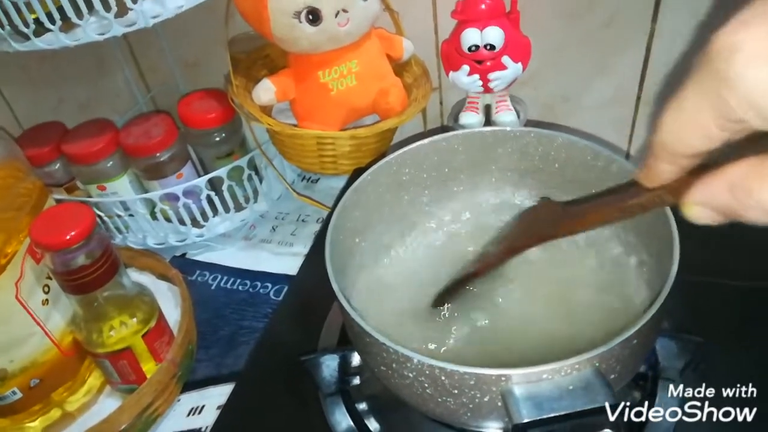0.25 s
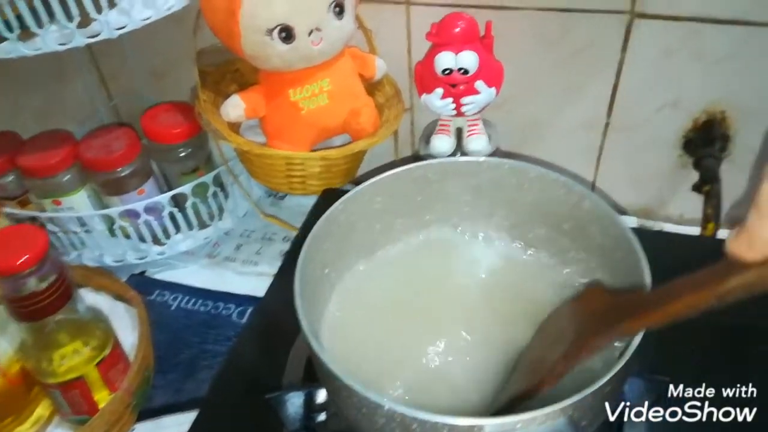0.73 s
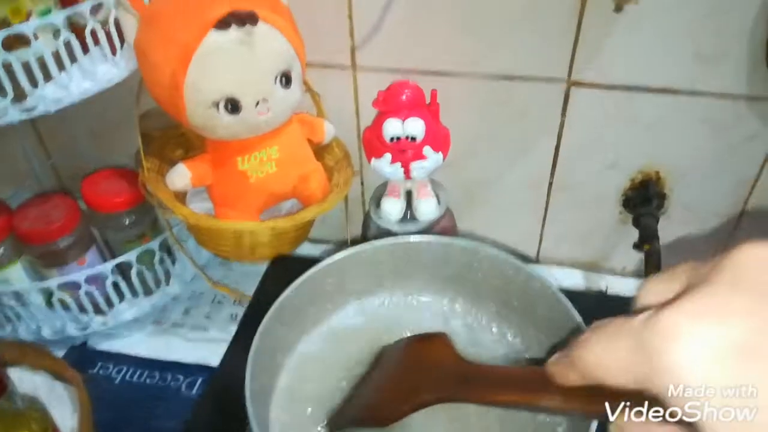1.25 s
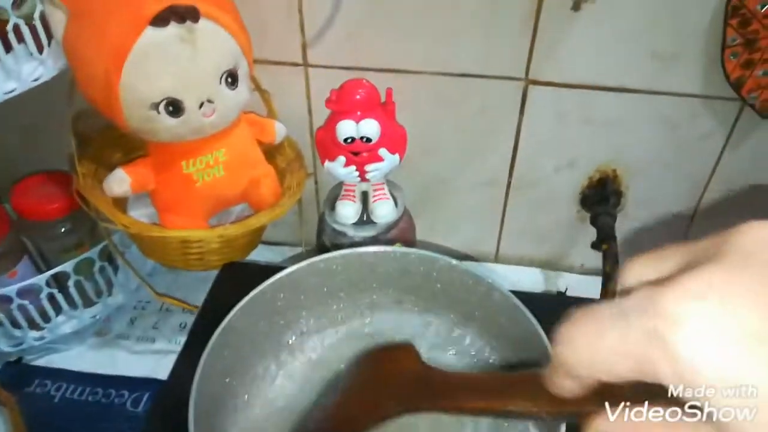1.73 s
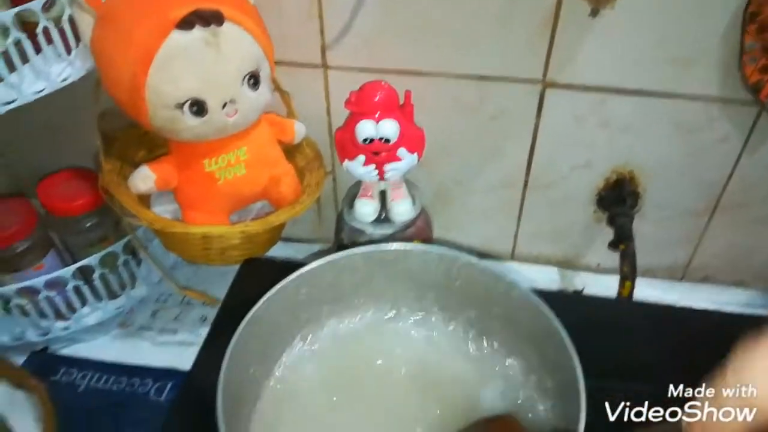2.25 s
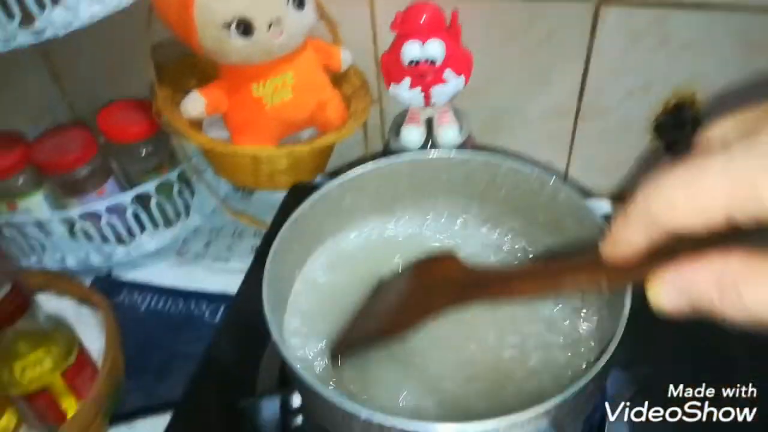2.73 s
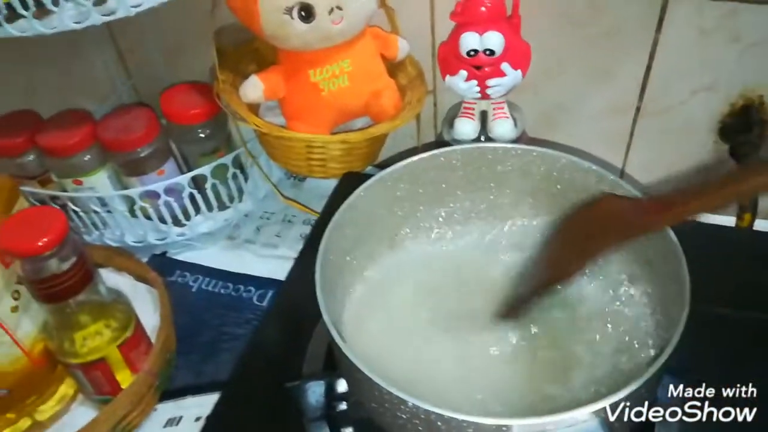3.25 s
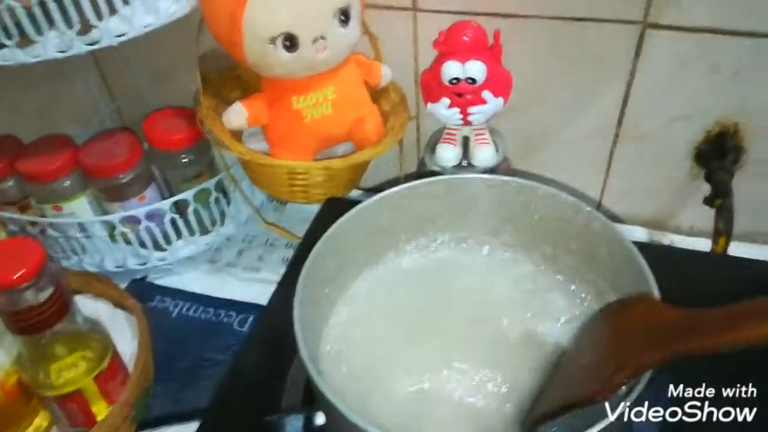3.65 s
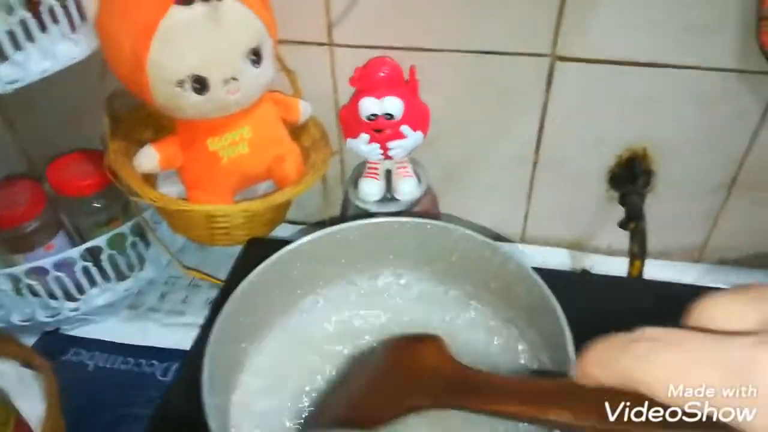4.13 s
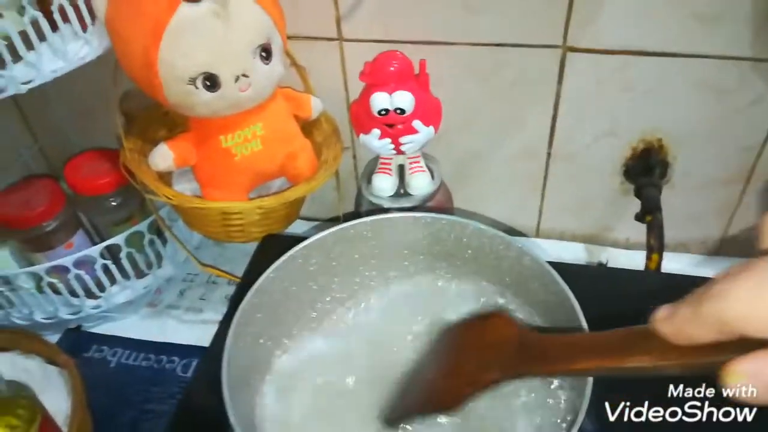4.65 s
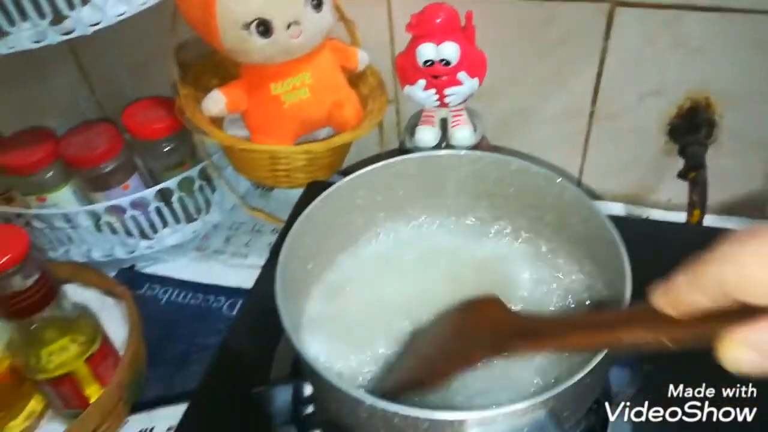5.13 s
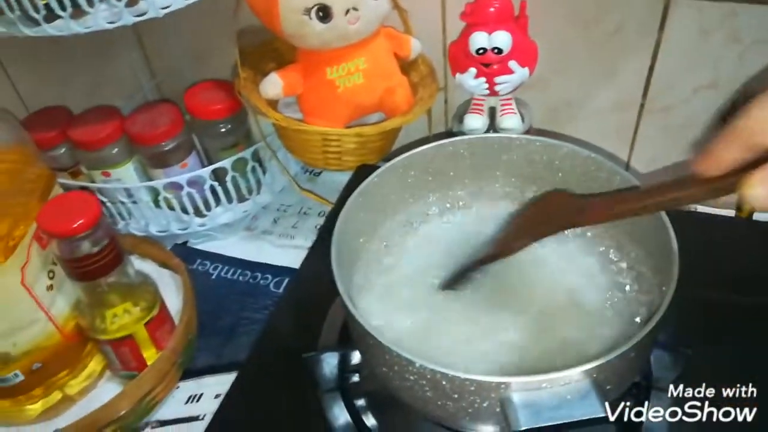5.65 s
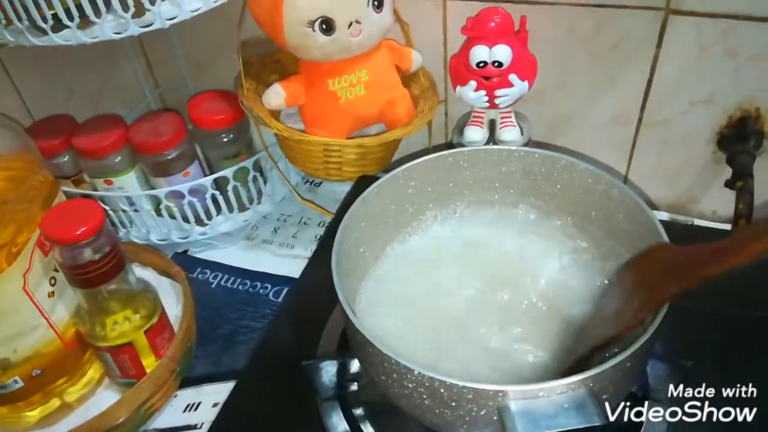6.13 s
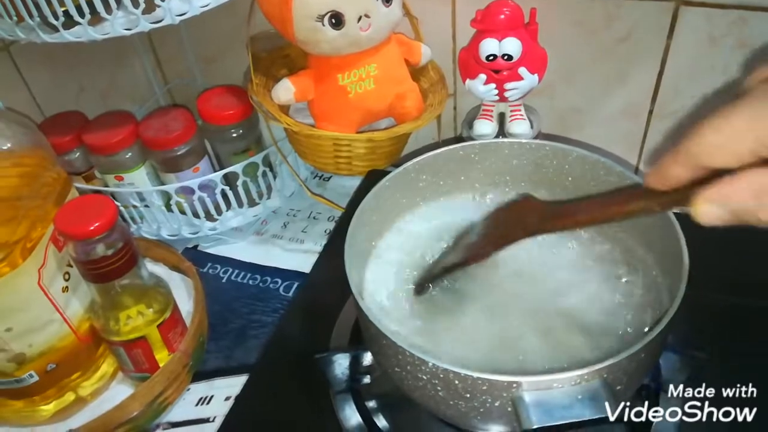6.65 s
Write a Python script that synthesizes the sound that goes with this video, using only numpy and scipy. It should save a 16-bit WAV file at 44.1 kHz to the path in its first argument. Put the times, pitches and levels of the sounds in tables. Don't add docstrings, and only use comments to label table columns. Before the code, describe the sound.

A quiet, steady hiss of syrup simmering over a gas flame, full of fine bursting bubbles. A wooden spoon stirs with soft rubs and thin singing drags along the metal pan. Deep bumps boom from about two seconds, strongest near three with clacking jars and shelves, then fade, leaving hiss and light stirring. Close handheld phone in a tiled kitchen, duller on the left and brighter on the right.

```python
import sys
import numpy as np
from scipy import signal
from scipy.fft import rfft, irfft, next_fast_len
from scipy.io import wavfile
from scipy.ndimage import uniform_filter1d

SR = 44100
rng = np.random.default_rng(int(sys.argv[2]) if len(sys.argv) > 2 else 0)


def amp(db):
    return 10 ** (np.asarray(db, float) / 20)


def write(x):
    x = np.atleast_2d(x).T
    wavfile.write(sys.argv[1], SR, np.round(np.clip(x, -1, 1) * 32767).astype(np.int16))


N = 304113
TIME = np.arange(N) / SR
PADDED = next_fast_len(N)
FREQ = np.maximum(np.fft.rfftfreq(PADDED, 1 / SR), 1)


def on_log(table, column=1):
    table = np.array(table)
    return np.interp(np.log(FREQ), np.log(table[:, 0]), table[:, column])


def unit(x):
    return x / np.sqrt(np.mean(x ** 2))


def ring(hz, width_hz):
    return 1 / (1 + 1j * (FREQ - hz ** 2 / FREQ) / width_hz)


def through(x, response):
    return irfft(rfft(x, PADDED) * response, PADDED)[..., :N]


def walk(rate_hz):
    hold = int(SR / rate_hz)
    steps = np.repeat(rng.standard_normal(N // hold + 1), hold)
    return 1.5 * uniform_filter1d(uniform_filter1d(steps, hold), hold)[:N]


def stroke(start_s, length_s, rise, fall):
    age = np.clip(TIME - start_s, 0, None) / length_s
    return (1 - np.exp(-age / rise)) * np.exp(-age ** fall)


def crackle(rate_hz, spread_db):
    size = amp(spread_db * np.minimum(rng.exponential(size=N), 3))
    return (rng.random(N) < rate_hz / SR) * np.sign(rng.standard_normal(N)) * size


def ports(direct, diffuse):
    # freq_hz, likeness_0_to_1, right_lead_rad
    port_link = [(30, 0.92, 0), (110, 0.91, 0), (166, 0.24, -1), (280, 1, .5), (426, 0.66, 1.03),
                 (614, 0.24, 4.5), (802, 0.83, 4), (956, 0.5, 7.5), (1650, 0.73, 6.5), (2000, 0.08, 7),
                 (2490, 0, 9), (3210, 0.63, 6.5), (4970, 0, 10), (15700, 0.6, -5)]
    alike = np.clip(on_log(port_link), 0, 1)
    lead = np.exp(1j * on_log(port_link, column=2))
    right = through(direct, alike * lead) + through(diffuse, np.sqrt(1 - alike ** 2))
    return np.array([direct, right])


def simmer():
    # freq_hz, density_db_per_hz
    left_hiss = [(30, 1), (70, 2), (105, 8), (190, -15), (310, -7.5), (450, -13), (800, -9.5), (1150, -3.5),
                 (1650, -3.5), (2100, -2.5), (3000, -4.5), (6000, -9), (10000, -19.5), (15500, -28)]
    # freq_hz, density_db_per_hz
    right_hiss = [(30, 6), (70, 1), (105, 7.5), (200, -18.5), (310, -7.5), (450, -13), (650, -8),
                  (1350, -12), (1650, -10.5), (2000, -11.5), (2600, -4.5), (5200, -10.5), (8500, -6),
                  (15000, -9.5), (15900, -25)]
    # freq_hz, width_hz, left_db, right_db
    pan_modes = [(263.5, 33, -3, 3), (328, 17, -13, -8), (515, 19, 2, -0.5), (706, 87, -15, -4),
                 (1023, 12.6, 5, -12), (1157, 75, -14.5, 5.5), (1516, 24, -2, 6), (1587, 31, 1, 7.5),
                 (1720, 44, 2.5, -5), (1835, 29, -4.5, -7), (2390, 56, -12, -12), (2660, 50, -20, -4),
                 (3184, 61, -24, -12), (3970, 78, -1.5, -14), (7700, 260, -2, -9.5)]
    # time_s, vigour_db, extra_steam_db, left_minus_right_db
    boil_course = [(0, 0.5, 0, 0.5), (.8, 0.5, 1, -1.5), (1.2, 0, -1.5, 0), (2.2, 0.5, -1.5, .5),
                   (3.1, -1, 0, -1), (3.6, -0.5, -0.5, -1.5), (4.15, -1.5, 1, 0), (4.7, 0, -0.5, -0.5),
                   (5.3, -1.5, .5, 1.5), (5.6, -4, 0.5, -1), (6.1, 0, 2.5, -0.5), (6.6, -4, 1.5, 1),
                   (6.9, -1.5, 1, 0)]
    # start_s, length_s, surge_db
    steam_surges = [(0.096, 0.22, 2), (.44, 0.19, 3.5), (.64, 0.34, 0), (1.59, .1, 2.5), (1.98, 0.15, 2.5),
                    (2.382, 0.22, 3), (2.705, 0.12, 0.5), (2.96, 0.36, 3), (3.29, 0.34, 7),
                    (3.886, 0.054, 2), (4.49, 0.12, 2), (4.767, 0.24, 2.5), (5.184, 0.13, 1.5),
                    (5.463, 0.42, 4), (5.86, 1, 2), (6.805, 0.19, 0)]

    time_s, *controls = np.transpose(boil_course)
    boil_db, steam_db, turn_db = (np.interp(TIME, time_s, db) for db in controls)
    surge_db = sum(db * stroke(start_s, length_s, rise=0.16, fall=3.7)
                   for start_s, length_s, db in steam_surges)
    follow_boil, follow_surge = (0.66, 0.89, 0.68), (0.23, 0.42, 1.12)
    swing_db = [a * boil_db + b * surge_db for a, b in zip(follow_boil, follow_surge)]
    swing_db[2] += steam_db
    pan_db = turn_db - 0.25 * surge_db

    pair = ports(*(rng.standard_normal(N) + 0.46 * unit(crackle(1600, spread_db=5.0)) for _ in range(2)))
    rings = 1 + sum(amp(np.array([[left_db], [right_db]])) * np.abs(ring(hz, width_hz)) ** 2
                    for hz, width_hz, left_db, right_db in pan_modes)
    spectra = rfft(pair, PADDED) * amp(np.array([on_log(left_hiss), on_log(right_hiss)])) * rings

    out, gust = 0, walk(30)
    for step in range(28):
        hz = 31.25 * 2 ** (step / 3)
        window = np.cos(np.pi / 2 * np.clip(3 * np.log2(FREQ / hz), -1, 1)) ** 2
        band = irfft(spectra * window, PADDED)[:, :N]
        weights = [np.interp(np.log(hz), np.log([500, 1500, 3200, 8000]), row) for row in np.eye(4)[1:]]
        flicker_db = np.interp(np.log(hz), np.log([100, 400, 2500, 9000]), [1.54, 3.23, 0.53, 0.57])
        level_db = np.dot(weights, swing_db) + 0.4 * weights[2] * gust + flicker_db * walk(14)
        out = out + band * amp(level_db + sum(weights) * np.array([pan_db, -pan_db]) / 2)
    return unit(out) * amp(-53.5)


def spoon():
    # start_s, level_db, ring_hz, length_s, left_minus_right_db
    knock_events = [(.09, -69, 350, 0.04, -20), (.486, -59, 300, 0.026, -1), (1.047, -63.5, 380, 0.037, 5),
                    (1.56, -62, 440, 0.13, -1), (1.984, -58, 284, 0.039, 0), (2.296, -56.5, 1600, 0.076, 6),
                    (2.6, -54, 1640, 0.025, 4), (2.7, -57, 1540, 0.072, 6), (3.227, -59.5, 2140, 0.044, 10),
                    (3.328, -65.5, 1900, 0.25, 16), (3.47, -64.5, 670, 0.056, -9),
                    (5.227, -59.5, 317, 0.11, 1), (5.476, -62.5, 325, 0.03, 1), (0.94, -60, 2520, .3, -8),
                    (3.2, -59, 1650, 0.27, 8), (5.63, -59.5, 1520, 0.065, 5), (5.74, -66.5, 1560, .15, 7),
                    (6.4, -62, 1600, .1, 5), (6.122, -55.5, 820, 0.019, -12),
                    (6.141, -57.5, 796, 0.051, -10.5), (6.135, -58, 1170, 0.022, -10),
                    (6.17, -63, 915, 0.042, -12), (6.42, -65.5, 395, 0.093, -9),
                    (6.508, -72, 287, 0.081, 0), (4.9, -83, 7650, 0.42, -10), (5.9, -83, 7700, 0.32, -8),
                    (6.4, -73.5, 7650, 1.2, -12), (.1, -65, 3180, .7, -2), (6.2, -68, 7600, 0.69, -9.5),
                    (3.2, -65, 2150, 0.32, 3), (3.045, -61, 4120, 0.24, -2), (3.06, -62, 4570, .04, 0),
                    (3.06, -64, 3300, .045, 0)]
    # start_s, level_db, centre_hz, length_s, left_minus_right_db
    scrape_events = [(1.04, -61, 2780, 0.034, -4), (1.918, -50, 3800, 0.025, 2),
                     (1.929, -51.5, 1100, 0.048, 3), (1.96, -59.5, 1525, 0.15, 2),
                     (2.042, -59, 2170, 0.077, 10), (2.1, -57.5, 1070, 0.053, 6),
                     (2.836, -61, 1500, 0.025, 5), (2.9, -58, 1540, 0.036, 8),
                     (3.055, -52.5, 3360, 0.049, -1), (3.062, -54.5, 1650, 0.074, 10),
                     (3.066, -49.5, 938, 0.044, -1), (4.816, -57, 497, 0.046, -3),
                     (5.184, -63.5, 460, 0.036, -21), (5.478, -60.5, 496, 0.027, -11),
                     (6.124, -55, 1380, 0.017, -8), (6.139, -59, 1500, 0.019, -4),
                     (2.845, -63, 1700, 0.011, 3), (2.925, -66, 1600, .03, 1), (1.935, -54, 1900, .03, 2),
                     (2.906, -59, 1300, 0.011, 3), (2.875, -48, 900, .008, 0), (3.85, -62, 3130, .09, -2),
                     (2.9, -58, 1690, 0.025, 2), (6.123, -62, 1900, 0.023, -1), (6.123, -58, 650, .03, -3),
                     (6.127, -54, 1300, .007, -6), (3.06, -57, 4600, .04, 0), (3.065, -57, 2500, .04, 3),
                     (5.483, -58, 500, .012, -3), (1.38, -63, 2550, .3, -2)]

    out = np.zeros((2, N))
    rub = ports(*(rng.standard_normal(N) + .5 * unit(crackle(1200, spread_db=11.0)) for _ in range(2)))
    for table, spread in ((knock_events, 6.2), (scrape_events, 27.5)):
        for start_s, level_db, hz, length_s, pan_db in table:
            near = slice(int(start_s * SR), int((start_s + 2 * length_s + .05) * SR))
            b, a = signal.iirpeak(hz, np.sqrt(hz) / spread, fs=SR)
            tone = signal.lfilter(b, a, signal.lfilter(b, a, rub[:, near]))
            gain = amp(level_db + np.array([[pan_db], [-pan_db]]) / 2)
            out[:, near] += unit(tone) * stroke(start_s, length_s, rise=0.12, fall=1.34)[near] * gain
    return out


def singing():
    # start_s, length_s, first_hz, last_hz,
    # level_db
    singing_strands = [(.095, 0.06, 3230, 3200, -60), (0.2, 0.143, 3150, 3000, -58.5),
                       (0.047, 0.14, 2500, 2500, -57), (0.55, 0.043, 3170, 3180, -58),
                       (.6, 0.08, 2800, 3170, -62), (0.57, 0.1, 3240, 3700, -64), (0.07, .11, 1530, 1480, -60),
                       (.07, 0.28, 1760, 1730, -63), (0.4, 0.05, 1650, 1500, -60),
                       (0.43, 0.065, 1570, 1570, -52), (0.47, 0.1, 1600, 1800, -63),
                       (.5, 0.1, 1900, 1500, -65), (0.795, .03, 2640, 2640, -56.5),
                       (0.915, 0.096, 2460, 2450, -55), (1.045, 0.035, 3300, 2200, -54),
                       (0.36, .17, 3170, 2300, -72), (.17, 0.097, 1440, 1430, -60.5),
                       (1.13, 0.082, 2420, 2450, -54), (1.45, 0.25, 2700, 2420, -65),
                       (1.74, 0.16, 3350, 3335, -63.5), (1.88, 0.185, 2500, 2720, -60),
                       (2.2, .22, 2300, 2200, -60.5), (1.9, .08, 2640, 3000, -62),
                       (3.1, 0.086, 3600, 2900, -61), (2.38, 0.081, 3150, 2500, -60),
                       (3.862, 0.062, 2680, 2720, -56), (3.893, 0.045, 2750, 2650, -49),
                       (3.87, .09, 3050, 3050, -62), (3.5, 0.31, 2500, 2850, -64),
                       (4.2, 0.23, 2580, 2700, -64), (4.6, 0.41, 1740, 1740, -64),
                       (5.33, 0.33, 1720, 1900, -65.5), (5.7, 0.394, 1780, 1740, -67),
                       (6.225, 0.055, 1740, 1680, -57), (6.302, 0.346, 1740, 1700, -63),
                       (3.055, 0.088, 1660, 1720, -49), (3.06, 0.15, 1474, 1443, -56),
                    (3.123, .05, 1706, 1620, -60), (3.212, 0.099, 1770, 1720, -53.5),
                    (3.232, 0.077, 1540, 1530, -60), (3.287, 0.076, 1773, 1757, -56.5),
                    (3.325, 0.066, 1586, 1624, -54), (3.346, 0.088, 1710, 1775, -52),
                    (3.422, 0.205, 1790, 1750, -61.5), (3.423, .08, 1620, 1620, -61),
                    (3.07, 0.044, 1894, 1890, -59), (3.3, 0.075, 2210, 2200, -57),
                    (3.387, 0.082, 2000, 1960, -63), (3.646, 0.062, 1790, 1765, -58),
                    (3.717, .18, 1674, 1624, -63.5),
                       (.265, .04, 3200, 3280, -60), (.735, 0.033, 3100, 3120, -57),
                       (.78, .03, 3130, 3110, -59), (.09, .025, 1790, 1800, -60),
                       (.22, .05, 1400, 1440, -61), (.26, 0.027, 1755, 1720, -57),
                       (.965, 0.031, 2600, 2520, -55), (1.02, .06, 2420, 2380, -56),
                       (1.03, .05, 2780, 2800, -61), (1.21, .04, 2390, 2430, -57),
                       (1.28, .02, 2380, 2300, -60), (1.325, .03, 3380, 3350, -61),
                       (3.225, .06, 2140, 2200, -60), (3.42, .05, 2040, 1950, -64),
                       (3.52, .04, 2190, 2180, -61), (3.76, .04, 2570, 2560, -59),
                       (3.78, .04, 2700, 2700, -60), (5.575, .025, 1120, 1140, -65),
                       (5.645, .025, 1800, 1790, -61), (5.69, .04, 1650, 1680, -62),
                       (5.76, .03, 1800, 1850, -61), (5.85, .03, 1820, 1770, -60),
                       (5.885, 0.046, 1163, 1130, -62), (5.9, .04, 1817, 1750, -58),
                       (5.89, .035, 1570, 1520, -61), (5.935, 0.032, 1680, 1600, -54),
                       (5.955, .025, 1850, 1780, -57), (5.95, .03, 1400, 1380, -60),
                       (5.98, .04, 2070, 2050, -60), (6.03, .025, 1500, 1500, -62),
                       (6.127, 0.032, 1270, 1270, -60), (6.125, .03, 1620, 1630, -63),
                       (6.135, 0.022, 1900, 1950, -65)]

    in_phase, quadrature = (
        unit(uniform_filter1d(uniform_filter1d(rng.standard_normal(N), 320), 200)) for _ in range(2))
    in_phase = in_phase + .9
    grain = amp(2.2 * walk(70))
    even = grain / (in_phase ** 2 + quadrature ** 2 + .1) ** .3
    wander = 1 + .003 * walk(30)

    out = np.zeros((2, N))
    strands = singing_strands
    for k, (start_s, length_s, first_hz, last_hz, level_db) in enumerate(strands):
        near = np.arange(int(start_s * SR), min(int((start_s + 2 * length_s) * SR), N))
        own = (near + 9973 * k + np.array([[0], [4999]])) % N
        glide_hz = np.interp(TIME[near], [start_s, start_s + length_s], [first_hz, last_hz])
        phase = 2 * np.pi * np.cumsum(glide_hz * wander[own[0]]) / SR + np.array([[0], [np.pi / 2]])
        tone = (in_phase[own] * np.cos(phase) + quadrature[own] * np.sin(phase)) * even[own]
        out[:, near] += amp(level_db) * stroke(start_s, length_s, rise=0.15, fall=2.06)[near] * tone
    return ports(*out)


def even_noise(hz, width_hz):
    z = signal.hilbert(through(rng.standard_normal(N), ring(hz, width_hz) ** 2))
    return unit(through((z / np.abs(z)).real, ring(hz, 2.0 * width_hz) ** 2))


def bumps():
    # start_s, length_s, room_tone_hz, tone_db, thud_db
    bump_events = [(0.237, 0.095, 57.5, -59, -67), (0.313, 0.049, 57.4, -64, -48.5),
                   (0.375, 0.11, 57.3, -54.5, -54), (1.708, 0.075, 62.5, -38, -56),
                   (1.787, 0.22, 58.7, -47, -54.5), (2.058, .19, 57.7, -34, -51.5),
                   (2.276, 0.32, 58.5, -48.5, -55.5), (2.563, 0.14, 56.8, -27.5, -44.5),
                   (2.709, 0.2, 55.5, -43.5, -54), (2.824, 0.03, 54.7, -25, -37.5),
                   (2.854, 0.054, 54.5, -39, -38), (2.922, 0.049, 54.6, -31, -36.5),
                   (2.962, 0.081, 54, -39.5, -46), (3.034, 0.08, 54.14, -37, -41.5),
                   (3.122, 0.087, 54.6, -40, -48), (3.198, .11, 54.2, -50, -53.5),
                   (3.316, 0.22, 52.8, -54, -56.5), (3.647, 0.078, 56.1, -51.5, -62),
                   (3.824, 0.19, 55.8, -62, -61.5), (4.045, 0.049, 60, -66, -71),
                   (4.285, 0.067, 60.1, -59, -71.5), (4.386, 0.093, 57.4, -52.5, -60.5),
                   (4.472, .11, 60, -64, -60)]
    # start_s, length_s, level_db
    air_shoves = [(.24, .15, -58), (0.442, 0.079, -55), (1.706, 0.11, -37), (2.042, 0.09, -40.5),
                  (2.2, 0.17, -53), (2.564, 0.16, -48), (2.818, 0.12, -33), (3.055, 0.058, -29.5),
                  (3.105, 0.081, -30.5), (3.187, 0.059, -44), (3.297, 0.23, -50), (3.983, 0.11, -56.5),
                  (4.306, 0.2, -43)]

    shove, thud = even_noise(17.35, 10.0), even_noise(84.1, 47.3)
    start_s, length_s, hz, tone_db, thud_db = np.transpose(bump_events)
    swells = np.array([stroke(s, length, rise=0.22, fall=3.6) for s, length in zip(start_s, length_s)])
    pitch_hz = np.interp(TIME, start_s + length_s / 2, hz) * (1 + 0.031 * walk(29.9))
    phase = 2 * np.pi * np.cumsum(pitch_hz) / SR
    tones = -np.sqrt(2) * np.sin(phase - phase[(start_s * SR).astype(int), None])
    push = sum(amp(db) * stroke(s, length, rise=0.17, fall=2.6) for s, length, db in air_shoves)
    return amp(tone_db) @ (swells * tones) + amp(thud_db) @ swells ** 0.93 * thud + push * shove


def modes(table):
    return sum((-1) ** k * amp(db) * ring(hz, width_hz) for k, (hz, width_hz, db) in enumerate(table))


def rattle():
    # start_s, length_s, rattle_db, brightness_db
    shake_events = [
        (2.561, 0.082, -49.5, 0),
        (2.826, 0.038, -42, 4),
        (2.876, 0.013, -45.5, 0.5),
        (2.877, 0.066, -41.5, -2),
        (2.932, 0.058, -58, -5),
        (3.057, 0.049, -61, -18),
        (3.125, 0.19, -62.5, -23),
    ]
    # time_s, over_chatter_db
    clack_events = [
        (2.832, 26),
        (2.845, 19),
        (2.877, 30),
        (2.908, 21.5),
    ]
    # freq_hz, width_hz, level_db
    shelf_modes = [(136.4, 9.8, 3), (160.4, 13, -2.5), (236.4, 18, 3), (270.7, 20, 0), (324, 15, -3.5),
                   (362, 29, -6.5), (400, 25, -7), (474, 19, -13), (520, 47, 0), (604, 22, 1),
                   (706, 78, -1), (860, 76, -6.5), (1070, 140, -6), (1251, 280, -17.5)]

    start_s, length_s, low_db, bright_db = np.transpose(shake_events)
    shakes = np.array([stroke(s, length, rise=0.046, fall=2.9) for s, length in zip(start_s, length_s)])
    low = modes(shelf_modes[:7]) * amp(23.5)
    high = modes(shelf_modes[7:11]) * ring(540, 700) * amp(19.5)
    top = modes(shelf_modes[11:]) * ring(1400, 1100) * amp(19.0)
    high_db = low_db + bright_db
    top_db = high_db + 1.6 * (low_db - low_db.max())

    clacks = np.zeros(N)
    for time_s, db in clack_events:
        clacks[int(time_s * SR)] = -amp(db)
    paths = []
    for _ in range(2):
        chatter = unit(crackle(4000, spread_db=2.0)) + clacks
        body = through(amp(low_db) @ shakes * chatter, low)
        edge = through(amp(high_db) @ shakes * chatter, high)
        clink = through(amp(top_db) @ shakes ** 0.65 * chatter, top)
        paths.append(body + edge + clink)
    left, right = ports(*paths)
    return np.array([amp(1.0) * through(left, 1 - 0.5 * ring(680, 300)), right])


def scene():
    boom = bumps()
    booms = np.array([np.roll(boom, 5), boom])
    return simmer() + spoon() + singing() + booms + rattle()


def patchy(x, depth_db, above_hz, mood_db):
    # freq_hz, bar_db
    mute_bar = [(3200, -13), (4500, -8.5), (7500, -4.5), (15500, -4)]
    # freq_hz, extra_db
    dull_extra = [(6000, 0), (10000, 1.5), (13500, 4), (15500, 11)]

    hz, _, z = signal.stft(x, SR, nperseg=2048)
    field = uniform_filter1d(uniform_filter1d(rng.standard_normal(z.shape), size=9, axis=1), size=2, axis=2)
    z = z * amp(depth_db * field / field.std() * np.clip(hz / above_hz, 0, 1)[:, None])
    size = np.sqrt(uniform_filter1d(np.abs(z) ** 2, size=6, axis=1))
    usual = uniform_filter1d(uniform_filter1d(size, size=24, axis=1), size=5, axis=2)
    bright_db = np.interp(hz, *np.transpose(mute_bar), left=-60)
    dull_db = bright_db + np.interp(hz, *np.transpose(dull_extra))
    mood = mood_db * rng.standard_normal(z[:, :1].shape)
    bar_db = np.array([dull_db, bright_db])[:, :, None] + mood
    return signal.istft(z * (size > usual * amp(bar_db)), SR, nperseg=2048)[1][:, :N]


def top_cut(x):
    return signal.sosfilt(signal.butter(12, 15730, fs=SR, output="sos"), x)


def record(dry):
    mottled = patchy(dry, depth_db=2.5, above_hz=3000, mood_db=.8)
    low_cut = 1 / (1 + 12 / (1j * FREQ)) ** 2
    return top_cut(through(mottled, low_cut))


dry = scene()
out = record(dry)
write(out)
```